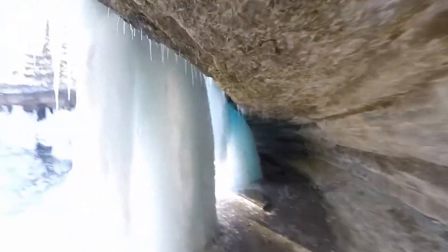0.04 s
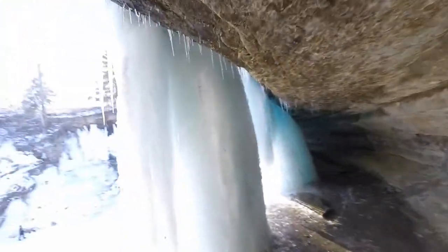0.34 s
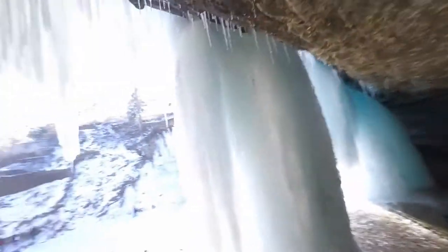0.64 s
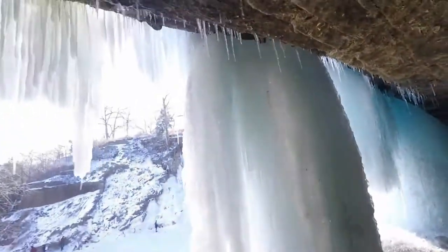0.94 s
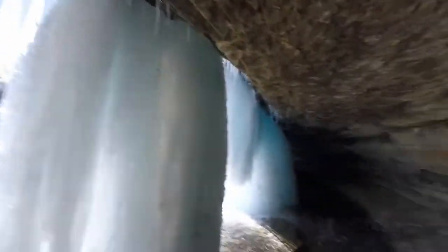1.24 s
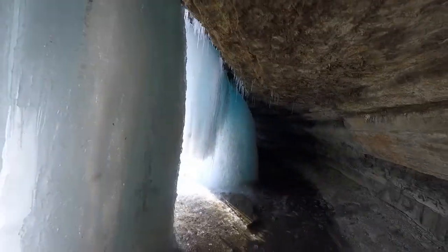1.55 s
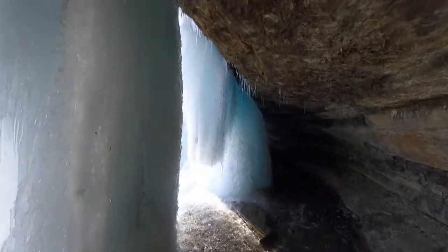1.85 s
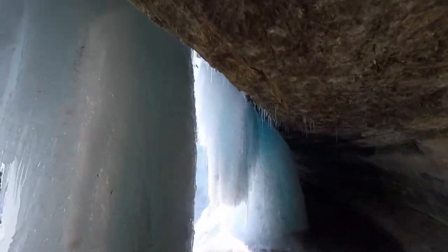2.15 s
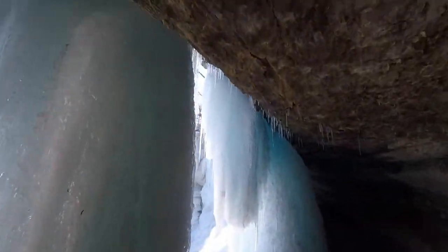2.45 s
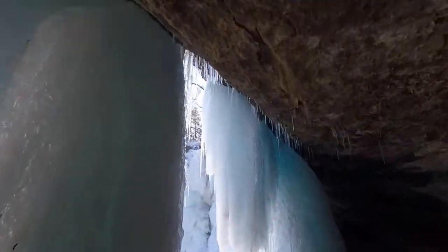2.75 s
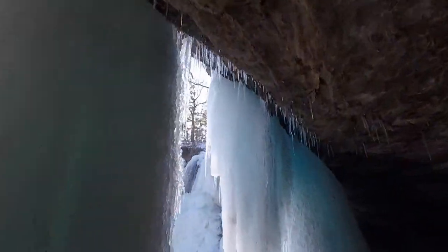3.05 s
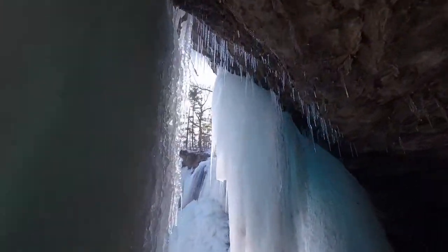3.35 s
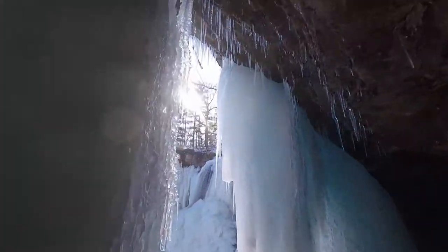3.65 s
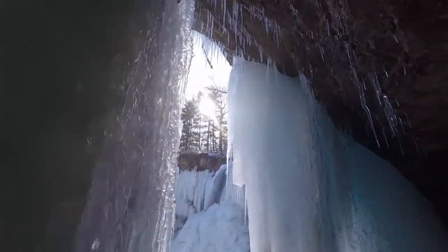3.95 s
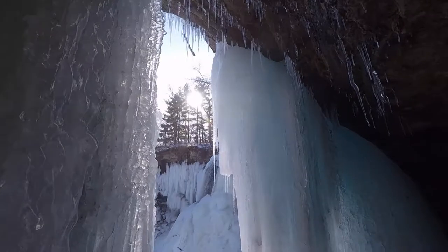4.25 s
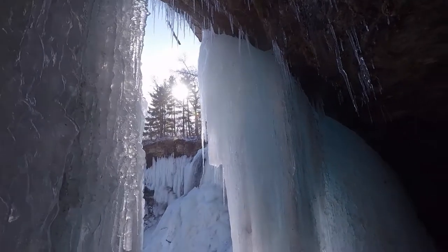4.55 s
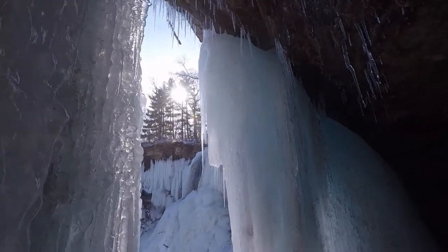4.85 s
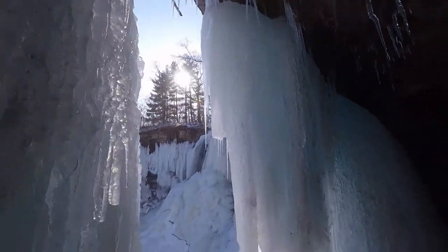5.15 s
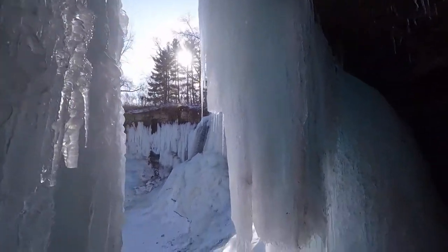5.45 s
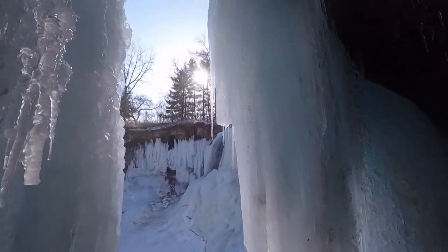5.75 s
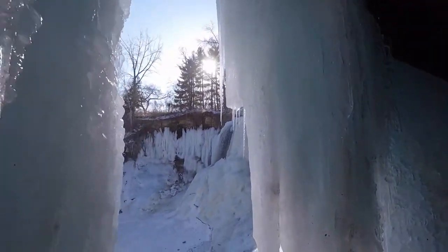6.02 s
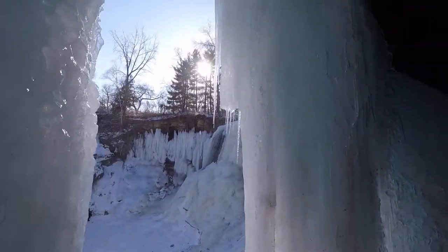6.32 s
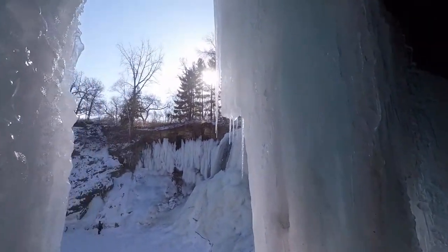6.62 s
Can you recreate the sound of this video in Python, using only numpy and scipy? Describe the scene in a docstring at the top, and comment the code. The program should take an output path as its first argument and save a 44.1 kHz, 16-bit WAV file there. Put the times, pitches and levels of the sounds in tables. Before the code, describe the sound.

From the start, low wind rumbles on a hand-held microphone behind a frozen waterfall, easing slightly over time. Distant water hisses softly throughout, with sharp, high ice ticks, a fine crackle and tiny icicle drips that gradually fade. Slow, uneven footsteps cross icy rock, each a very deep thump with a gritty scuff. The first two, at about 0.5 and 1 second, are heavy, with sole knocks and short rasps. A light step follows at 1.7, then others at 2.3, 2.8 and 3.4. Between 2 and 3.5 seconds, fine spray brightens the water. At 3.8 comes a quick cluster of knocks and scrapes, then softer steps at 4.3 and 5.1. A jacket swishes faintly near 0.3, 3.3 and 5.1 seconds, and dull handling bumps recur. The last step lands at about 6.1 with the sharpest knock and a scuff, leaving wind, water and a few ticks until nearly 7 seconds.

```python
"""Slow steps over icy rock behind a frozen waterfall, heard from a hand-held camera whose case rings.
From the start, wind rumbles on the microphone, far water hisses, ice ticks and icicles drip.
From 0.5 s, footfalls thump through the wrist; soles knock, scuff and rasp, a jacket swishes, the grip
shifts. From about 2 to 3.5 s, a gap in the ice opens and spray brightens the water. The drips fade;
the last step lands near 6.1 s."""
import sys
import numpy as np
from scipy import signal
from scipy.fft import rfft, irfft, next_fast_len
from scipy.io import wavfile

SR = 44100
rng = np.random.default_rng(int(sys.argv[2]) if len(sys.argv) > 2 else 0)


def wrap_up_sound(samples):
    """Save the sound to the file named by the first command line argument, as 16-bit audio."""
    columns = np.atleast_2d(samples).T
    # keep every value between -1 and 1, then stretch to whole-number steps
    tamed = np.clip(columns, -1, 1)
    steps = np.round(tamed * 32767).astype(np.int16)
    wavfile.write(sys.argv[1], SR, steps)


N = 298998
TIME_S = np.arange(N) / SR

# Source spectra. Each row: frequency in Hz, relative density in dB.
WIND_SPECTRUM = [(8, -2), (18, -4.5), (30, 3.5), (42, -5), (60, -15), (85, -33), (120, -41.5), (250, -48),
                 (800, -58.5), (3000, -100)]
WATER_SPECTRUM = [(60, 19.5), (200, 4.5), (400, 2), (900, 0.5), (1800, 1.5), (2400, -2), (3300, 0),
                  (4500, -6), (7000, -10), (9000, -9.5), (15000, -12)]
SPRAY_SPECTRUM = [(200, -36), (1500, -10), (3000, 3), (3800, -4.5), (4250, -1.5), (4600, 3), (5000, 3.5),
                  (5400, 1.5), (6200, -10.5), (7600, -6), (9500, -11.5), (15000, -15.5)]
CLOTH_SPECTRUM = [(300, -40), (900, 3), (1300, 9.5), (1900, 5), (2400, 15.5), (3000, 7.5), (6000, -7),
                  (15000, -20)]
RASP_SPECTRUM = [(500, -25), (1000, -11), (1290, 4.5), (1450, -1.5), (1650, 1.5), (2000, -4.5), (3000, -18),
                 (8000, -24)]
GRIT_SPECTRUM = [(100, -22), (320, 7), (450, -1.5), (600, -3.5), (850, -0.5), (1300, -2.5), (1700, -1.5),
                 (2400, 7.5), (4000, 4.5), (6500, 0), (9000, -1.5), (15000, -8)]
CRUNCH_SPECTRUM = [(40, -54), (100, -41), (180, -1.5), (350, -0.5), (550, 0.5), (900, -9.5), (1400, -16.5),
                   (3000, -27), (9000, -44)]
# Envelopes of the wind and of one band of the water. Each row: time in seconds, level in dB.
WIND_ENVELOPE = [(0, -32.5), (.7, -36.5), (1.7, -37.5), (2.05, -40), (2.5, -35), (3.0, -38.5), (3.6, -38.5),
                 (4.5, -40), (5.1, -39), (5.7, -41), (6.7, -42.5)]
WATER_BAND_ENVELOPE = [(0, -79), (.15, -70), (.32, -68.5), (.55, -74.5), (.74, -69.5), (1.0, -72.5),
                       (1.45, -73.5), (1.6, -73), (1.85, -67.5), (2.1, -75), (2.5, -70.5), (3.3, -72),
                       (4.0, -71), (4.6, -73), (4.9, -69.5), (5.17, -68), (5.45, -76), (5.9, -71.5),
                       (6.4, -76.5), (6.75, -72)]
# Clear ice cracks. Each row: start in seconds, level in dB, centre in Hz, T60 in seconds.
ICE_TICKS = [(.04, -51, 8750, .04), (0.063, -60, 5430, 0.075), (.114, -62, 5900, 0.037),
             (.24, -47, 11000, 0.019), (.433, -56, 6360, 0.03), (.4728, -49, 11000, 0.019),
             (.487, -54, 9500, .012), (.5267, -52, 10500, .03), (.644, -56, 4700, .049),
             (.668, -54, 9000, .02), (.838, -53, 3770, 0.056), (.838, -51, 11000, .025),
             (.849, -61, 5700, .04), (.865, -52, 11000, .025), (.893, -57, 6000, 0.054),
             (.9235, -49, 12000, .018), (.938, -57, 7900, .05), (1.172, -55, 3900, 0.12),
             (1.176, -59.5, 4900, 0.13), (1.289, -53, 10000, .014), (1.375, -52, 11000, .015),
             (1.542, -45, 11000, .012), (1.596, -58, 7500, .03), (1.914, -49, 3770, 0.05),
             (1.939, -57, 4000, .06), (1.912, -52, 10500, 0.024), (1.937, -58.5, 6700, 0.073),
             (2.015, -56, 4700, .04), (2.132, -52, 10500, .025), (2.284, -55, 8000, .025),
             (2.296, -53.5, 6940, 0.039), (2.4174, -49, 12500, .012), (2.502, -58, 7000, .025),
             (2.654, -52.5, 4020, 0.053), (2.655, -55, 2600, .08), (2.7696, -45, 11000, .012),
             (2.905, -50, 10500, .035), (3.2325, -56, 13000, .02), (3.372, -54, 11000, .02),
             (3.768, -51.5, 5970, 0.068), (3.797, -54, 12000, .03), (3.83, -49, 11200, 0.035),
             (3.873, -55, 6100, 0.082), (4.139, -55, 6530, 0.028), (4.196, -53, 12000, .033),
             (4.2855, -55, 11500, .02), (4.877, -52.5, 6160, 0.11), (5.006, -57, 4530, 0.12),
             (5.6965, -48, 11000, .012), (6.123, -46, 11500, .014), (6.123, -50, 4300, .02),
             (6.609, -53, 9700, .05), (6.6473, -56, 11000, .02)]
# Sleeve swishes. Each row: midpoint in seconds, level in dB, half-length in seconds.
SLEEVE_SWISHES = [(0.289, -66.5, 0.19), (2.664, -74, 0.031), (3.149, -61.5, 0.015), (3.217, -69, 0.038),
                  (3.379, -58.5, 0.038), (5.123, -65.5, 0.14)]
# Grip shifts. Each row: midpoint in seconds, jolt in dB, jolt in Hz, bump in dB, bump in Hz,
# half-length in seconds.
GRIP_SHIFTS = [(0.758, -28, 43, -64, 169, 0.022), (1.247, -26, 23.7, -66.5, 171, 0.037),
               (1.566, -31, 35.2, -69, 231, 0.048), (2.243, -32, 38.6, -73, 200, 0.047),
               (2.662, -27, 38, -70, 170, 0.022), (3.001, -24.5, 14, -65, 173, 0.031),
               (3.288, -23, 34, -67, 170, 0.023), (3.738, -27, 52, -71, 170, 0.015),
               (3.812, -42, 57, -56, 174, 0.017), (4.283, -33.5, 50.5, -63, 179, 0.062),
               (4.475, -35.5, 42, -71, 170, 0.035), (4.728, -38.5, 45, -59, 198, 0.037),
               (5.134, -26, 25, -67, 170, 0.028), (5.304, -34, 37, -79, 165, 0.02),
               (5.47, -32.5, 37, -83, 170, 0.041), (5.613, -41, 31, -66, 230, 0.026),
               (6.383, -37, 47, -70, 168, 0.026), (6.553, -43, 40, -58.5, 134, 0.029)]
# Heel and sole contacts. Each row: start in seconds, level in dB, low-pass corner in Hz.
SOLE_KNOCKS = [(0.487, -57, 2000), (0.529, -54, 2500), (0.565, -47, 1400), (1.033, -46.5, 700),
               (1.058, -56, 2500), (1.096, -48.5, 1500), (2.32, -59, 700), (2.816, -62, 3000),
               (3.757, -48, 1100), (3.793, -53, 1400), (3.846, -56, 3000), (6.028, -41.5, 7000),
               (6.088, -51, 1800)]
# Modes the contacts excite. Each row: frequency in Hz, gain in dB, T60 in seconds.
CONTACT_MODES = [(170, 3, 0.028), (296, -11, 0.042), (570, -5, 0.025), (1260, -5, 0.014), (1970, -9, 0.018),
                 (2210, 0.5, 0.026), (4400, -22, .008)]
# Catches on bare rock. Each row: midpoint in seconds, level in dB, half-length in seconds.
ROCK_RASPS = [(0.498, -63, 0.013), (0.575, -65, 0.012), (1.039, -62, 0.011), (2.821, -66, 0.013),
              (2.89, -64, 0.016), (3.765, -61, 0.016), (3.802, -55.5, 0.019), (3.839, -58.5, 0.016),
              (4.309, -67.5, 0.031), (6.095, -59.5, 0.025)]
# Slides on grit. Each row: midpoint in seconds, level in dB, half-length in seconds, tilt in dB/octave.
GRIT_SCUFFS = [(.492, -67, 0.0092, -2), (0.574, -61.5, 0.011, -9), (1.044, -69, .02, -9),
               (1.302, -62.5, 0.014, 6), (2.512, -63, 0.069, -1.5), (2.839, -63, 0.046, -2),
               (3.267, -61.5, 0.02, 3), (3.363, -61.5, 0.033, -2), (3.766, -55, 0.026, -6),
               (3.801, -59.5, 0.017, -1), (3.849, -58, 0.038, -3), (5.173, -67, 0.046, 3),
               (5.814, -64.5, 0.025, 4), (6.097, -64, 0.11, -5), (6.644, -66, 0.06, 4)]
# Footfalls. Each row: heel midpoint in seconds, thump in dB, thump in Hz, half-length in seconds,
# wrist jolt in dB, heel crunch in dB, settling sway in dB, settling crunch in dB.
FOOTFALLS = [(0.511, -7, 29.9, 0.026, -20, -63.5, -12, -61), (1.039, -9.5, 24, 0.022, -29.5, -63, -29, -72),
             (1.657, -23.5, 21.1, 0.038, -46, -73, -31, -73),
             (2.319, -12.5, 26.3, 0.027, -25.5, -63, -21, -65.5),
             (2.825, -23, 32.3, 0.049, -31, -64.5, -31.5, -76),
             (3.395, -10.5, 29.6, 0.033, -38, -64.5, -24.5, -74),
             (3.822, -23, 31.2, 0.054, -53, -62, -20, -71), (4.335, -24, 26.7, 0.07, -38, -66, -23.5, -71),
             (5.053, -28.5, 36.7, 0.027, -53, -70, -33, -78),
             (6.088, -9, 24.3, 0.024, -31, -60.5, -18, -67)]
# Camera case resonances. Each row: centre in Hz, width in Hz, gain in dB.
CASE_RESONANCES = [(1300, 120, 2), (1757, 320, 4.5), (2293, 615, 6), (2590, 480, 2), (3260, 176, -8.5),
                   (3850, 1480, 9.5), (4500, 310, 3), (6014, 500, 5.5), (6715, 1870, 7.5),
                   (10830, 700, 3.5)]


def from_db(db):
    """Decibels to gain."""
    return 10 ** (np.asarray(db) / 20)


def unit_rms(x):
    """Scale to rms 1."""
    return x / np.sqrt(np.mean(x ** 2) + 1e-20)


def add(out, start_s, sound):
    """Mix a sound in at start_s."""
    start = round(start_s * SR)
    first, last = max(start, 0), min(start + len(sound), N)
    out[first:last] += sound[first - start:last - start]


def colour(x, spectrum, tilt_db_per_octave=0):
    """Shape by a spectrum, tilted above 1024 Hz; rms 1."""
    size = next_fast_len(len(x))
    octave = np.log2(np.maximum(np.fft.rfftfreq(size, 1 / SR), 1))
    hz, db = np.transpose(spectrum)
    gain_db = np.interp(octave, np.log2(hz), db) + tilt_db_per_octave * np.clip(octave - 10, 0, None)
    return unit_rms(irfft(rfft(x, size) * from_db(gain_db), size)[:len(x)])


def noise_band(size, hz, octaves):
    """Band-passed noise around hz; rms 1."""
    edges_hz = np.clip([hz / 2 ** (octaves / 2), hz * 2 ** (octaves / 2)], 10, SR / 2 - 1000)
    band_pass = signal.butter(2, edges_hz, "band", fs=SR, output="sos")
    return unit_rms(signal.sosfilt(band_pass, rng.standard_normal(size)))


def grains(size, per_s, spread_db):
    """Random impulses, mostly small, a few large; rms 1."""
    chance, strength, sign = rng.random((3, size))
    heights = from_db(spread_db * np.minimum(-np.log(1 - strength), 5))
    return unit_rms((chance < per_s / SR) * heights * np.sign(sign - .5))


def swell(half_s):
    """Time about a midpoint, and a Gaussian envelope that is 1/e at +-half_s."""
    t = np.arange(-SR // 3, SR // 3) / SR
    return t, np.exp(-(t / half_s) ** 2)


def wind(gust_db=3, gusts_per_s=9):
    """Eddies buffet the microphone port, almost all below 60 Hz."""
    knots = rng.standard_normal(1000)
    gusts = np.interp(TIME_S * gusts_per_s, np.arange(len(knots)), knots)
    level_db = np.interp(TIME_S, *np.transpose(WIND_ENVELOPE)) + gust_db * np.tanh(gusts)
    return from_db(level_db) * colour(rng.standard_normal(N), WIND_SPECTRUM)


def water(hiss_db=-61.5, gap_opening_s=(2.15, 3.45), spray_ramp_db=(-74, -67)):
    """Far water hisses, one band swelling and sinking; droplet spray rises as the gap opens."""
    hiss = from_db(hiss_db) * colour(rng.standard_normal(N), WATER_SPECTRUM)
    band_db = np.interp(TIME_S, *np.transpose(WATER_BAND_ENVELOPE))
    band = from_db(band_db) * noise_band(N, hz=2396, octaves=0.26)
    spray_db = np.interp(TIME_S, gap_opening_s, spray_ramp_db)
    droplets = grains(N, per_s=5000, spread_db=2)
    return hiss + band + from_db(spray_db) * colour(droplets, SPRAY_SPECTRUM)


def drips(count=120, drip_db=-68, spread_db=6, t60_s=0.071, fade_db_per_s=3):
    """Icicle drops land at random as 4-12 kHz pips, fainter as the walker moves on."""
    out, t = np.zeros(N), TIME_S[:SR // 10]
    for when, size, pitch in rng.random((count, 3)):
        start_s = when * N / SR
        pip = noise_band(len(t), hz=4000 * 3 ** pitch, octaves=0.46)
        level_db = drip_db + spread_db * (size - .5) - fade_db_per_s * start_s
        add(out, start_s, from_db(level_db - 60 * t / t60_s) * pip)
    return out


def splinters(count=200, splinter_db=-67, spread_db=10, t60_s=0.019, rise_db_per_s=0.63):
    """Fine ice splinters crackle at random, slowly growing louder."""
    out, t = np.zeros(N), TIME_S[:SR // 10]
    for when, size, pitch in rng.random((count, 3)):
        start_s = when * N / SR
        snap = noise_band(len(t), hz=9500 * 2 ** (pitch - .5), octaves=0.98)
        level_db = splinter_db + spread_db * (size - .5) + rise_db_per_s * start_s
        add(out, start_s, from_db(level_db - 60 * t / t60_s) * snap)
    return out


def ticks(rise_s=0.0022, snap_db=-13, snap_t60_s=0.0048, tail_db=-3.5):
    """Ice snaps, with a short scatter off the rock; the longer the ring, the purer the chink."""
    out, t = np.zeros(N), TIME_S[:SR // 4]
    attack = 1 - np.exp(-t / rise_s)
    snap = from_db(snap_db - 60 * t / snap_t60_s)
    for start_s, level_db, hz, t60_s in ICE_TICKS:
        tail = from_db(tail_db - 60 * t / t60_s)
        chink = noise_band(len(t), hz, octaves=0.7 / (1 + t60_s / 0.13))
        add(out, start_s, from_db(level_db) * attack * (snap + tail) * chink)
    return out


def jacket():
    """Threads slip over each other as the arms swing."""
    out = np.zeros(N)
    for mid_s, level_db, half_s in SLEEVE_SWISHES:
        t, speed = swell(half_s)
        cloth = colour(grains(len(t), per_s=2500, spread_db=3), CLOTH_SPECTRUM)
        add(out, mid_s + t[0], from_db(level_db) * speed * cloth)
    return out


def grip():
    """The shifting hand jolts the camera and softly bumps its case."""
    out = np.zeros(N)
    for mid_s, jolt_db, jolt_hz, bump_db, bump_hz, half_s in GRIP_SHIFTS:
        t, push = swell(half_s)
        jolt = from_db(jolt_db) * np.cos(2 * np.pi * jolt_hz * t)
        bump = from_db(bump_db) * noise_band(len(t), bump_hz, octaves=0.97)
        add(out, mid_s + t[0], push * (jolt + bump))
    return out


def knocks(spread_db=1.5):
    """Heel and sole strike the modes unevenly; soft contacts barely excite the high ones."""
    out, t = np.zeros(N), TIME_S[:SR // 4]
    for start_s, level_db, corner_hz in SOLE_KNOCKS:
        for hz, mode_db, t60_s in CONTACT_MODES:
            strike = from_db(level_db + mode_db + rng.normal(0, spread_db))
            rolloff = 1 / (1 + (hz / corner_hz) ** 2)
            ring = np.sin(2 * np.pi * hz * t) * from_db(-60 * t / t60_s)
            add(out, start_s, strike * rolloff * ring)
    return out


def rasps():
    """A loaded sole sticks and slips on bare rock in a coarse rattle."""
    out = np.zeros(N)
    for mid_s, level_db, half_s in ROCK_RASPS:
        t, pressure = swell(half_s)
        rattle = colour(grains(len(t), per_s=1000, spread_db=1), RASP_SPECTRUM)
        add(out, mid_s + t[0], from_db(level_db) * pressure * rattle)
    return out


def scuffs(slip_gain_db=-3, slip_half_s=0.06, slip_db_per_octave=-11):
    """Sliding soles break grit; each landing also slips, in proportion to its heel crunch."""
    out = np.zeros(N)
    slips = [(mid_s, crunch_db + slip_gain_db, slip_half_s, slip_db_per_octave)
             for mid_s, *_, crunch_db, _, _ in FOOTFALLS]
    for mid_s, level_db, half_s, tilt_db_per_octave in slips + GRIT_SCUFFS:
        t, pressure = swell(half_s)
        grit = colour(grains(len(t), per_s=2400, spread_db=3), GRIT_SPECTRUM, tilt_db_per_octave)
        add(out, mid_s + t[0], from_db(level_db) * pressure * grit)
    return out


def tread(sway_db, sway_hz, half_s, crunch_db):
    """Body weight sways and shudders the camera while the sole crushes frozen grit."""
    t, load = swell(half_s)
    sway = from_db(sway_db) * np.cos(2 * np.pi * sway_hz * t)
    shudder = from_db(crunch_db + 9) * noise_band(len(t), hz=80, octaves=0.9)
    crunch = from_db(crunch_db) * colour(grains(len(t), per_s=500, spread_db=4.5), CRUNCH_SPECTRUM)
    return load * (sway + shudder + crunch)


def footfalls(jolt_hz=52.5, roll_s=0.065, settle_hz=19.84, settle_half_s=0.053):
    """The heel lands and jolts the stiff wrist; the weight then settles on the ball of the foot."""
    out = np.zeros(N)
    for mid_s, thump_db, thump_hz, half_s, jolt_db, crunch_db, settle_db, settle_crunch_db in FOOTFALLS:
        t, load = swell(half_s)
        heel = tread(thump_db, thump_hz, half_s, crunch_db)
        jolt = from_db(jolt_db) * load * np.cos(2 * np.pi * jolt_hz * t)
        ball = tread(settle_db, settle_hz, settle_half_s, settle_crunch_db)
        add(out, mid_s + t[0], heel + jolt)
        add(out, mid_s + roll_s + t[0], ball)
    return out


def scene():
    """Mono sum at the microphone."""
    walker = footfalls() + scuffs() + rasps() + knocks() + grip() + jacket()
    return (walker + ticks() + splinters() + drips() + water() + wind())[None]


def record(dry):
    """The case resonates, one peaking filter per row; the top is cut at 15.3 kHz."""
    out = dry
    for hz, width_hz, gain_db in CASE_RESONANCES:
        omega, root_gain = 2 * np.pi * hz / SR, from_db(gain_db / 2)
        damping = np.sin(omega) * width_hz / (2 * hz)
        numerator = [1 + damping * root_gain, -2 * np.cos(omega), 1 - damping * root_gain]
        denominator = [1 + damping / root_gain, -2 * np.cos(omega), 1 - damping / root_gain]
        out = signal.lfilter(numerator, denominator, out)
    low_pass = signal.ellip(12, .1, 80, 15300, fs=SR, output="sos")
    return signal.sosfilt(low_pass, out)


dry = scene()
out = record(dry)
wrap_up_sound(out)
```